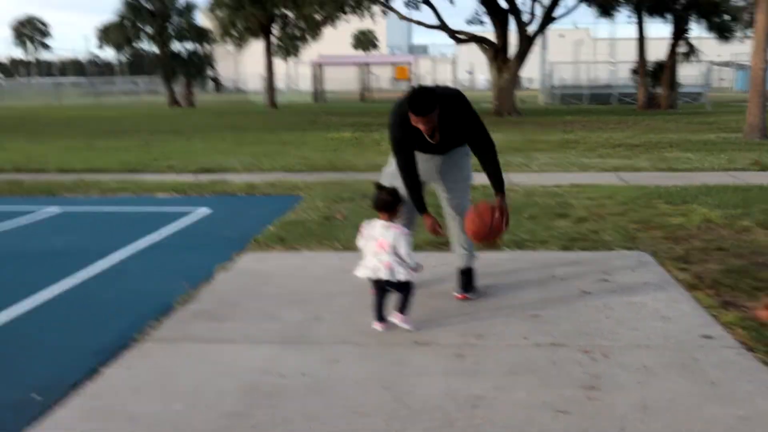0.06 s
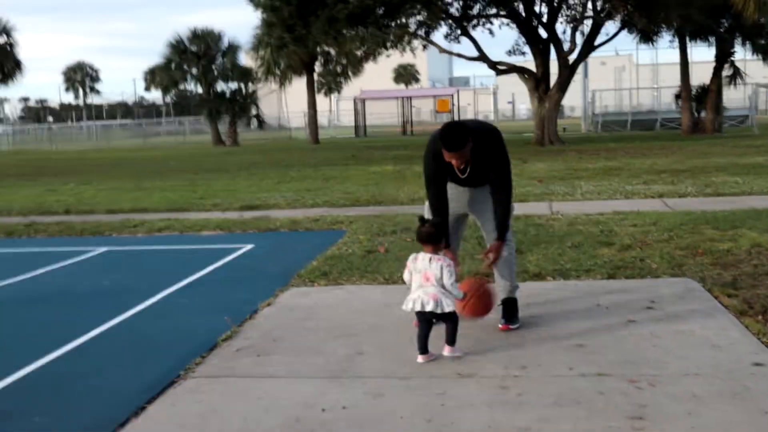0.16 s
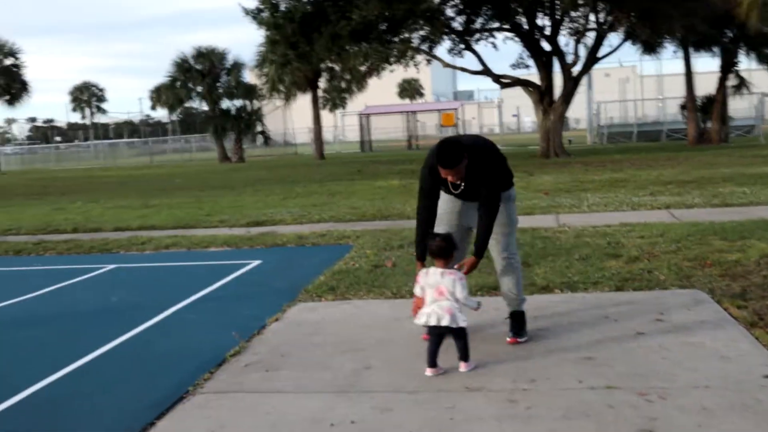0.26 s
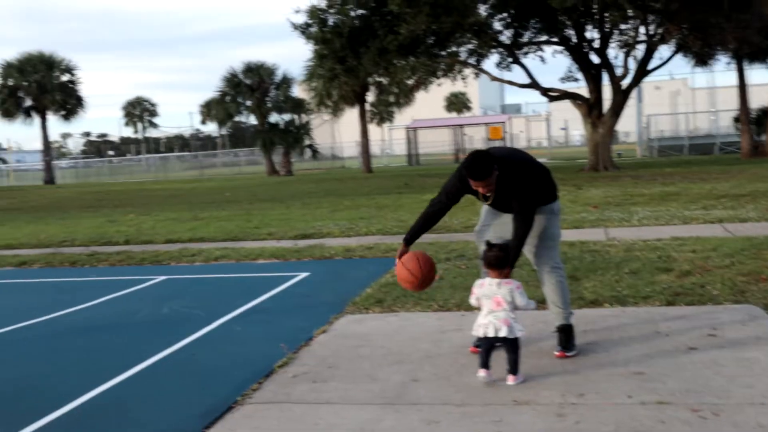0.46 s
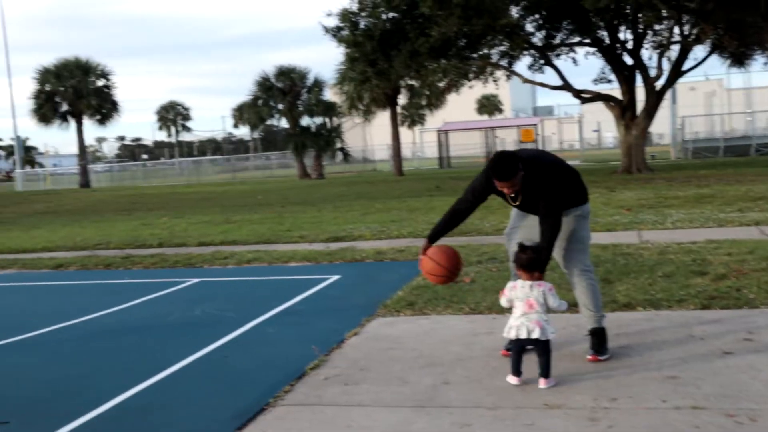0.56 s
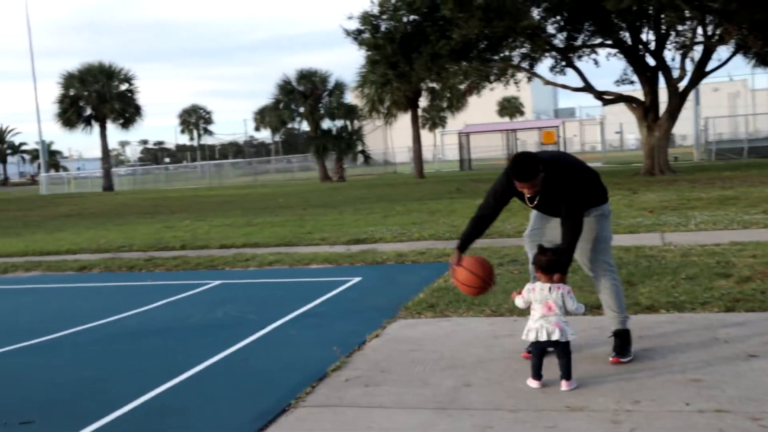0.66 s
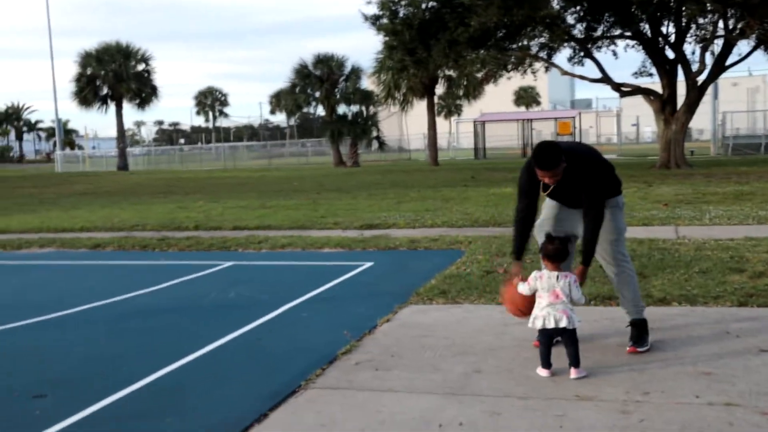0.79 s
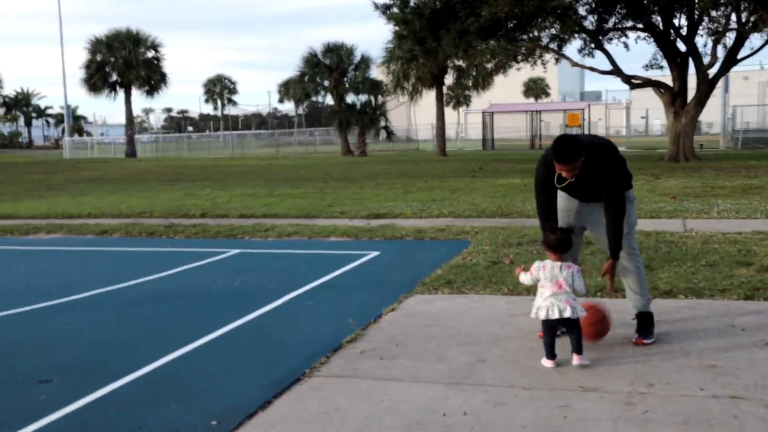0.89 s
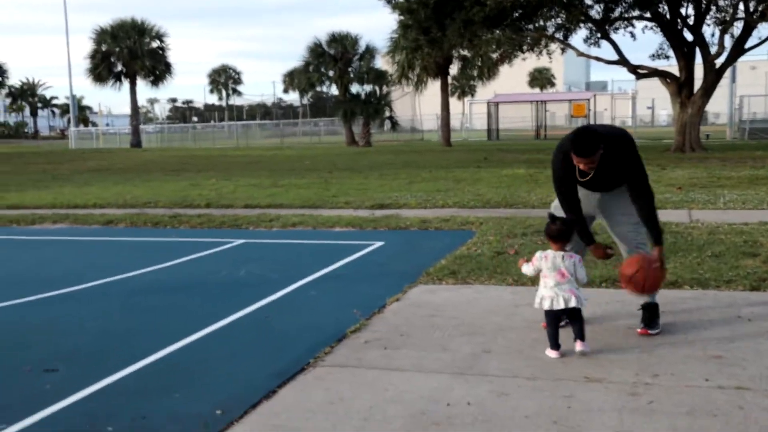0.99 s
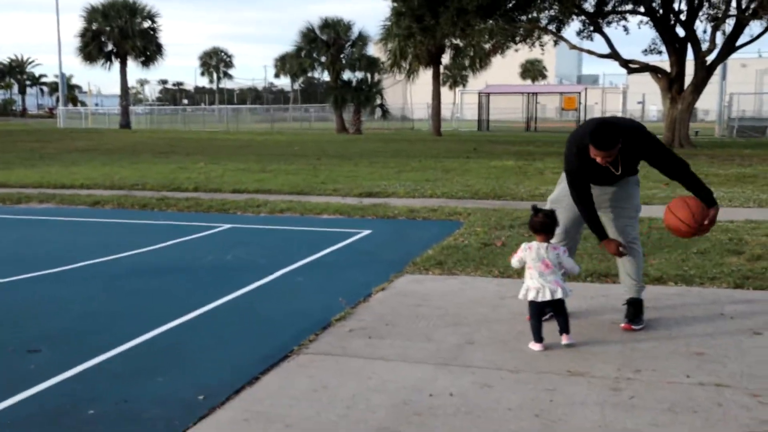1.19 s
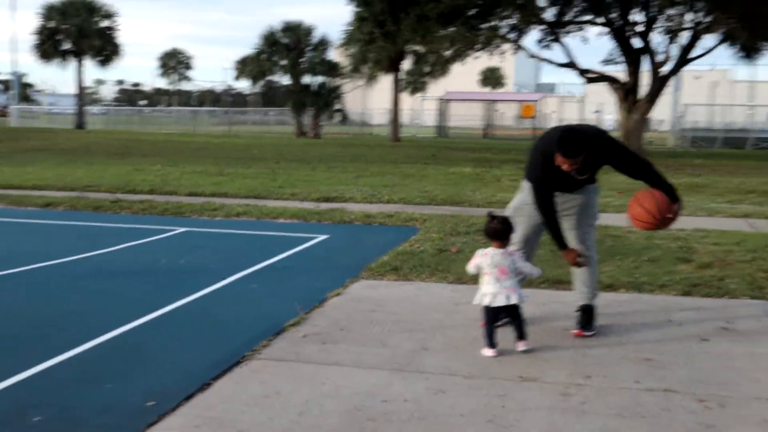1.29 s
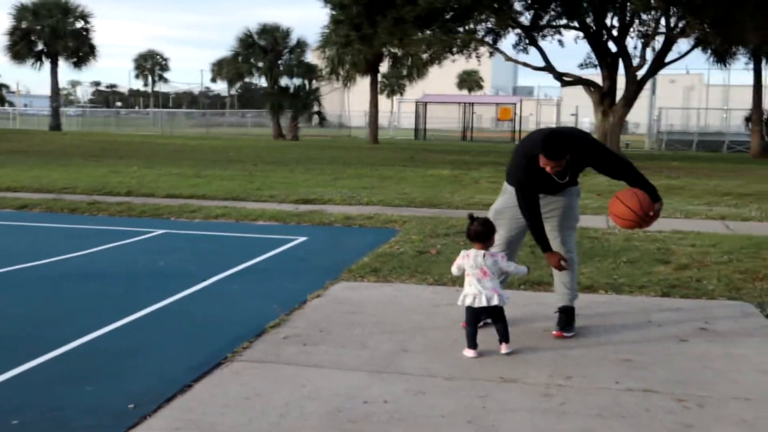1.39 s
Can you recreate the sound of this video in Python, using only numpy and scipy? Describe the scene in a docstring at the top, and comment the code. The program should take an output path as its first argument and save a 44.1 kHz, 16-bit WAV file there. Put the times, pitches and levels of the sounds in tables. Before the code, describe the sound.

A basketball hits concrete at about 0.32 seconds with a hard slap, hollow ping, brief echo and faint tail. Wind buffets the microphone from roughly 0.23 to 0.8, strongest and leaning left near 0.45, with two dry clicks. A tiny tick at 0.77 and a gritty triple shoe thud at 0.92 precede the second, crisper bounce at 0.99. A soft scuff swells near 1.16 over faint distant park hum.

```python
"""Two bounces in a windy park

A basketball bounces twice on concrete: struck modes and noise bursts, with an echo and a faint tail.
Between the bounces come a tiny tick and a shoe landing in three gritty thuds; after the second, a sole
scuffs as a swell of hiss. A gust buffets the microphone: lumpy low noise, short pressure swings and two
clicks in the left. A limiter ducks the whole scene, distant hum included, and slowly lets it back."""
import sys
import numpy as np
from scipy import signal
from scipy.fft import rfft, irfft
from scipy.io import wavfile

SR = 44100
rng = np.random.default_rng(int(sys.argv[2]) if len(sys.argv) > 2 else 0)


def master(y):
    """Save y as 16-bit WAV."""
    cut = np.clip(np.atleast_2d(y).T, -1, 1)
    pcm = np.round(cut * 32767)  # scale
    wavfile.write(sys.argv[1], SR, pcm.astype(np.int16))


N = 63945
T = np.arange(N) / SR  # seconds

# In every spectrum table density_db is a relative level per Hz.
# Pan is left minus right level; width is side minus mid level.

# stereo width of far sound: pitch_hz, width_db
FAR_WIDTH = [(60, -49.5), (360, -36), (650, -26), (1170, -10.5), (2120, -0.5), (3840, 4.5), (7000, 7.5),
             (12600, 17.5)]


def from_db(db):
    """Turn decibels into an amplitude gain."""
    return 10 ** (np.asarray(db) / 20)


def panned(db):
    """Left and right gains for a level difference; positive leans left."""
    return from_db(np.array([[db], [-db]]) / 2)


def at_hz(points, hz):
    """Interpolate a table along a log-frequency axis."""
    table_hz, value = np.transpose(points)
    return np.interp(np.log(hz + 1), np.log(table_hz), value)


def noise(spectrum, width):
    """Stereo noise of a given colour and width; its mid signal has rms 1."""
    hz = np.arange(N // 2 + 1) * SR / N
    mid_bins, side_bins = rfft(rng.standard_normal((2, N))) * from_db(at_hz(spectrum, hz))
    mid = irfft(mid_bins, N)
    side = irfft(side_bins * from_db(at_hz(width, hz)), N)
    return (mid + side * [[1], [-1]]) / mid.std()


def decay(start, t60):
    """Sudden start, then an exponential fall of 60 dB in t60 seconds."""
    return (T >= start) * from_db(-60 * np.maximum(T - start, 0) / t60)


def ring(start, hz, t60):
    """One struck mode: a decaying sine."""
    return decay(start, t60) * np.sin(2 * np.pi * hz * (T - start))


def swelling(rows):
    """Sum of smooth bell-shaped rises and falls in gain."""
    return sum(from_db(db) * np.exp(-((T - centre) / half) ** 2) for centre, half, db in rows)


def low_pass(x, hz):
    """Gentle second-order treble loss."""
    sos = signal.butter(2, min(hz, SR / 2 - 1), fs=SR, output="sos")
    return signal.sosfilt(sos, x + 1e-18)


def high_pass(x, hz):
    """Gentle second-order bass loss."""
    return signal.sosfilt(signal.butter(2, hz, "high", fs=SR, output="sos"), x + 1e-18)


def ball():
    """Each bounce flattens the skin in a double slap, thumps, knocks, pings the air inside and echoes."""
    # ball meets concrete: start_s, level_db, slap_db, thump_db, knock_hz, knock_db, smack_hz, smack_db,
    # echo_knock_hz, echo_knock_db, pan_db, slap_width_db (added to the near width)
    bounces = [(0.3165, -1.5, -4, 3, 1000, -16.5, 1390, -9, 1024, -22.5, -3.5, -2),
               (0.9929, -2, -5.5, -3.5, 973, -8.5, 1776, -10.5, 760, -18.5, 0.5, 2)]
    # air ringing inside the ball: pitch_hz, level_db, t60_s
    air_modes = [(968, -42.5, 0.28), (1300, -27, 0.077), (1624, -45, 0.07), (1920, -44.5, 0.22),
                 (2073, -47, 0.092), (2373, -49.5, 0.23), (2710, -48, 0.44), (3290, -55, 0.17),
                 (4480, -51, .25), (4850, -62, .15), (5720, -56, .25)]
    # brief ring of the rubber skin: pitch_hz, level_db, t60_s
    skin_modes = [(1640, -20.5, 0.0061), (2328, -21.5, .012), (3010, -32.5, 0.011), (4550, -30.5, 0.0085),
                  (5015, -23.5, 0.0066)]
    # slap of the pebbled skin: pitch_hz, density_db
    slap_spectrum = [(300, -16), (900, 1), (1800, 2.5), (2700, -2.5), (3700, -20.5), (4900, -8),
                     (6200, -10.5), (7500, -9.5), (10500, -14.5), (13500, -34)]
    # first reflections off the players and the slab: pitch_hz, density_db
    nearby_spectrum = [(100, -34), (220, -2), (370, 3.5), (560, -16), (780, -1), (950, -14), (1300, -7.5),
                       (2000, -34), (4000, -42), (9000, -42)]
    # sound scattered back by the surroundings: pitch_hz, density_db
    scatter_spectrum = [(150, -22), (350, 11), (550, -10), (800, 1), (1300, 8), (2400, 1), (3600, -9),
                        (6000, -11), (11000, -14.5), (14000, -42)]
    # stereo width of near sound: pitch_hz, width_db
    near_width = [(100, -43), (500, -35), (1000, -14), (3000, 2), (6000, 2), (12000, -3)]
    slap_t60_s, second_slap_s = 0.017, 0.0013
    thump_hz, radiates_above_hz = 190, 650
    echo_s, echo_cut_hz = 0.0125, 5600

    out = np.zeros((2, N))
    for (s, db, slap_db, thump_db, knock_hz, knock_db, smack_hz, smack_db,
         return_hz, return_db, pan_db, width_db) in bounces:
        modes = sum(from_db(mode_db) * ring(s, hz, t60)
                    for hz, mode_db, t60 in [*air_modes, *skin_modes])
        knock = from_db(knock_db) * ring(s, knock_hz, 0.018)
        smack = -from_db(smack_db) * ring(s, smack_hz, 0.015)
        # the second slap starts as strong but dies twice as fast
        contact = decay(s, slap_t60_s) + decay(s + second_slap_s, slap_t60_s / 2)
        slap_noise = noise(slap_spectrum, np.add(near_width, [0, width_db]))
        slap = from_db(-16 + slap_db) * contact * slap_noise
        # sharp pressure spike of the first touch
        spike = from_db(-6) * ring(s, 2570, 0.00054)
        struck = modes + knock + smack + slap + spike
        direct = high_pass(struck, radiates_above_hz) * panned(pan_db)

        # the thump enters a quarter period late
        thump = -from_db(-12 + thump_db) * ring(s + 1 / (4 * thump_hz), thump_hz, 0.02)
        delayed = np.array([np.interp(T - echo_s, T, channel) for channel in direct])
        echo = from_db(-16.5) * low_pass(delayed, echo_cut_hz)
        echo_knock = from_db(return_db) * ring(s + 0.0105, return_hz, 0.036)
        nearby = from_db(-26) * decay(s + echo_s, 0.13) * noise(nearby_spectrum, near_width)
        tail = from_db(-38.5) * decay(s, 0.62) * noise(scatter_spectrum, FAR_WIDTH)
        out += from_db(db) * (direct + thump + echo + echo_knock + nearby + tail)
    return out


def shoe():
    """A tiny dry tick, a step of three quick gritty thuds that settles, then a soft swell of scuffing hiss."""
    # heel, sole and toe of one step: start_s, thud_db, grit_db, thud_hz, clap_hz
    step = [(0.916, -17, -24, 413, 1110), (0.9237, -12.5, -25.5, 465, 1227),
            (0.930, -21.5, -31.5, 288, 1930)]
    # grit under the sole: pitch_hz, density_db
    grit_spectrum = [(200, -29), (600, 0), (1150, 3), (1700, -2.5), (2200, -2), (3000, -12), (4200, -12),
                     (6000, -18), (10000, -14), (13500, -25)]
    # dull rumple of the shoe as it settles: pitch_hz, density_db
    settle_spectrum = [(120, -26), (260, 9), (500, 5), (680, -10), (950, -9), (1500, -30)]
    # a tiny dry tick, then the swell of a scuffing sole: centre_s, half_length_s, level_db
    tick_and_scuff = [(0.7735, 0.00074, -41.5), (1.163, 0.067, -51.5)]
    # hiss of the tick and the scuff: pitch_hz, density_db
    scuff_spectrum = [(1500, -20), (3500, 0), (6000, 1), (10000, 1.5), (11700, -0.5), (13000, -32)]
    # stereo width of the step: pitch_hz, width_db
    step_width = [(100, -42), (450, -41), (850, -4), (2000, 9.5), (4000, 5.5), (12000, 7)]
    radiates_above_hz = 220

    out = swelling(tick_and_scuff) * noise(scuff_spectrum, step_width)
    for s, thud_db, grit_db, thud_hz, clap_hz in step:
        thud = ring(s, thud_hz, 0.026)
        settle = from_db(-12.5) * decay(s, 0.12) * noise(settle_spectrum, step_width)
        grit = decay(s, 0.024) * noise(grit_spectrum, step_width)
        clap = from_db(-3) * ring(s, clap_hz, 0.018)
        out += from_db(thud_db) * (thud + settle)
        out += from_db(grit_db) * (grit + clap)
    return high_pass(out, radiates_above_hz)


def wind():
    """Lumpy turbulence on the microphone ports, with single eddies as short pressure swings."""
    # course of the gust: time_s, rumble_db, flutter_db, pan_db
    gust = [(0, -32.5, -48, 9.5), (0.1, -38, -58.5, 8.5), (0.149, -36, -49.5, 7), (0.259, -29.5, -47.5, 18),
            (0.29, -21, -31.5, 6), (0.335, -26, -41, 13), (0.37, -20, -30.5, 4.5), (0.43, -21, -31.5, 19.5),
            (0.459, -16.5, -26.5, 25.5), (0.476, -25, -43, 10), (0.499, -18, -27.5, 22.5),
            (0.564, -18, -27.5, 16.5), (0.593, -30.5, -31.5, -1), (0.678, -28, -26, -3),
            (0.71, -32, -31.5, 0.5), (0.74, -30.5, -34.5, 1), (0.84, -41.5, -45, 0),
            (0.97, -41.5, -49.5, 0), (1.03, -40, -51.5, -0.5), (1.1, -43, -45, 0.5),
            (1.17, -52, -59.5, -0.5), (1.45, -56.5, -57, -0.5)]
    # low rumble of the wind: pitch_hz, density_db
    rumble_spectrum = [(15, -47), (28, -42), (55, -17), (80, -3.5), (115, -2.5), (170, -3.5), (250, -13),
                       (400, -35), (800, -78.5)]
    # faster flutter of the wind: pitch_hz, density_db
    flutter_spectrum = [(100, -38.5), (220, 5), (320, -3), (450, -10.5), (600, -18), (800, -25),
                        (1300, -51), (3000, -65)]
    # fine turbulence of the left port alone: pitch_hz, density_db
    port_spectrum = [(150, -28), (300, -7), (450, 3), (650, -10), (900, -11), (1400, -27), (3000, -59.5)]
    # low swell of the air ahead of the gust: centre_s, half_length_s, level_db
    swells = [(0.03, 0.057, -39), (0.15, 0.024, -28.5)]
    # colour of that swell: pitch_hz, density_db
    swell_spectrum = [(15, -13), (35, 4.5), (55, 6), (85, 0), (130, -24), (300, -46), (800, -77)]
    # single eddies hit the microphone: start_s, level_db, pitch_hz, pan_db
    buffets = [(0.2285, -23, 274, 10), (0.2690, -11.5, 151, 4), (0.2938, -10.5, 202, -13.5),
               (0.3040, -8.5, 263, 13.5), (0.3345, -8, 150, 6), (0.3615, -9, 240, 11.5),
               (0.3810, -11, 224, 9), (0.3998, -3.5, 170, 2), (0.4190, -12, 250, 12),
               (0.4271, -10.5, 228, 2), (0.4434, -8.5, 510, 13.5), (0.4473, -1.5, 250, 11),
               (0.4543, -0.5, 380, 19), (0.4592, -10, 360, 13.5), (0.491, -11.5, 347, 16),
               (0.4945, -2.5, 186, 2.5), (0.5078, -8, 377, 24.5), (0.5145, -17, 377, 11),
               (0.5335, -20.5, 252, 9.5), (0.5391, -2, 214, 10.5), (0.555, -18.5, 375, 16),
               (0.5696, -16, 481, 25.5), (0.5705, -7, 211, 12.5), (0.599, -18.5, 450, 4),
               (0.6150, -16, 290, 1), (0.6287, -11.5, 232, 0), (0.6482, -13.5, 338, 2),
               (0.661, -22.5, 436, 3), (0.678, -14, 458, 3.5), (0.694, -13.5, 367, 0.5),
               (0.7196, -13.5, 370, -1), (0.753, -18.5, 250, 0.5), (0.7902, -27, 278, -1),
               (0.8036, -23.5, 298, -3), (0.860, -31, 290, 0.5), (1.021, -26, 203, 0),
               (1.047, -30.5, 237, -1)]
    lumps_cutoff_hz, lumps_db = 65, 9.5
    buffet_peak_cycles = 0.52  # the swing's envelope peaks after this many cycles
    width = [(1, -62)]  # nearly mono at every pitch

    times, *columns = np.transpose(gust)
    rumble_db, flutter_db, pan_db = [np.interp(T, times, column) for column in columns]
    # soft saturation rounds off the rumble's peaks
    rumble = 2 * np.tanh(noise(rumble_spectrum, width) / 2) * from_db(rumble_db)
    lumps = low_pass(rng.standard_normal(N), lumps_cutoff_hz)
    flutter_gain = from_db(flutter_db + lumps_db * np.tanh(lumps / lumps.std()))
    flutter = noise(flutter_spectrum, width) * flutter_gain
    out = (rumble + flutter) * from_db(np.array([pan_db, -pan_db]) / 2)

    # the left port's turbulence grows as the wind leans left
    exposed = np.maximum(1 - from_db(-pan_db), 0)
    out[0] += exposed * from_db(-1.5) * flutter_gain * noise(port_spectrum, width)[0]
    out += swelling(swells) * noise(swell_spectrum, width)

    for start, db, hz, eddy_pan_db in buffets:
        cycles = np.maximum(T - start, 0) * hz
        age = cycles / buffet_peak_cycles
        envelope = (age * np.exp(1 - age)) ** 2
        swing = -np.sin(2 * np.pi * cycles)
        out += from_db(db) * panned(eddy_pan_db) * envelope * swing
    return out


def mono_bass(x):
    """Both microphones share the bass: remove the low part of the side signal."""
    side = (x[0] - x[1]) / 2
    sos = signal.butter(2, 191, fs=SR, output="sos")  # cutoff in Hz
    bass = signal.sosfiltfilt(sos, side)
    return x - bass * [[1], [-1]]


def crackles():
    """Dry clicks of the overloaded left microphone: very short rings at set times."""
    # two clicks in the left port amid the strongest gusts: start_s, level_db, pitch_hz
    clicks = [(0.445, -2.5, 2060), (0.4560, -2, 1300)]
    left = sum(from_db(db) * ring(s, hz, 0.0012) for s, db, hz in clicks)
    return np.array([left, np.zeros(N)])


def park():
    """Far hum of traffic and leaves: wide coloured noise that rises by half a decibel."""
    # distant traffic and leaves: pitch_hz, density_db
    park_spectrum = [(30, -25), (60, -10.5), (270, -5.5), (430, -9.5), (750, 0), (950, -5), (1400, -7),
                     (2300, -12), (3500, -19), (7000, -27.5), (9300, -37), (11300, -32), (12600, -47.5)]
    level_db = -42.5 + 0.5 * T / T[-1]
    return from_db(level_db) * noise(park_spectrum, FAR_WIDTH)


def scene():
    """Mix ball, shoe, wind, crackles and park."""
    return ball() + shoe() + mono_bass(wind()) + crackles() + park()


def record(dry):
    """A limiter ducks quickly and recovers slowly; what slips past it clips; the top is cut."""
    limit_db, attack_s, release_s = -2.5, 0.0002, 0.22  # both times are time constants
    cutoff_hz = 13200

    peak_db = 20 * np.log10(np.abs(dry).max(axis=0) + 1e-9)
    over_db = np.maximum(peak_db - limit_db, 1e-9)
    # hold each excess and let its decibels decay exponentially
    release = T / release_s
    held_db = np.exp(np.maximum.accumulate(np.log(over_db) + release) - release)
    smoothing = np.exp(-1 / (attack_s * SR))
    duck_db = signal.lfilter([1 - smoothing], [1, -smoothing], held_db)
    limited = np.clip(dry * from_db(-duck_db), -1, 1)
    return signal.sosfilt(signal.butter(12, cutoff_hz, fs=SR, output="sos"), limited)


dry = scene()
out = record(dry)
master(out)
```